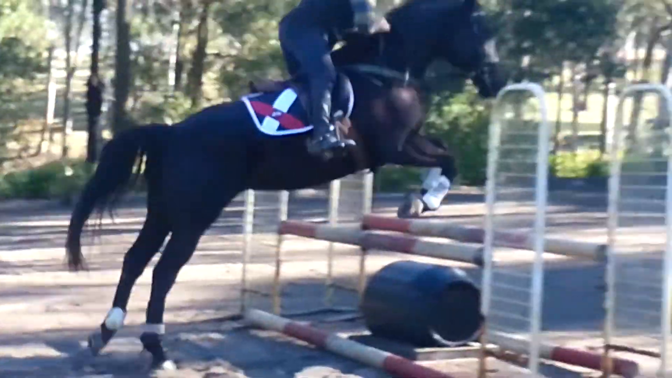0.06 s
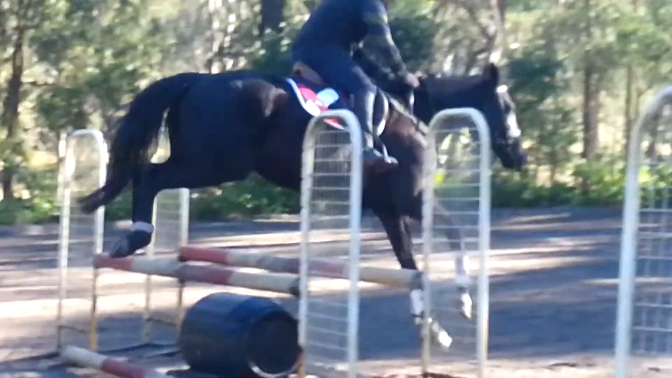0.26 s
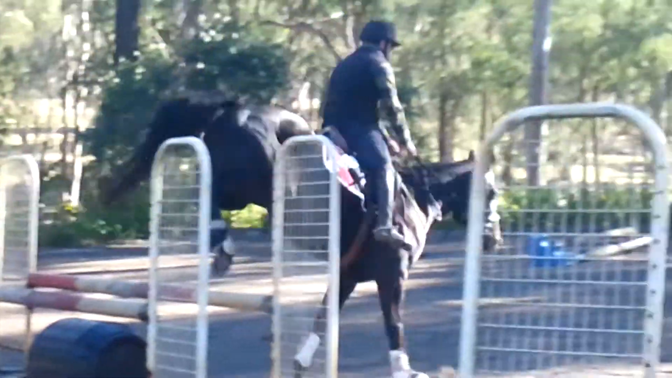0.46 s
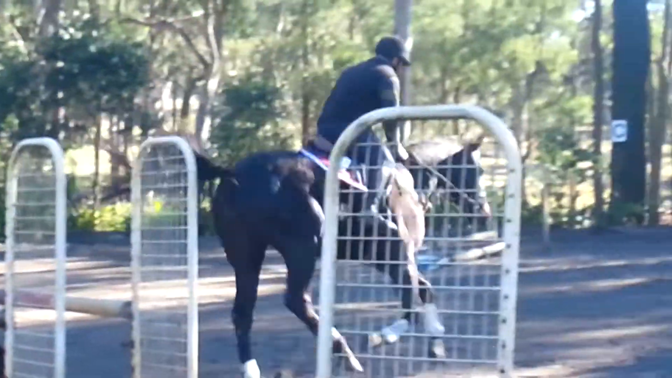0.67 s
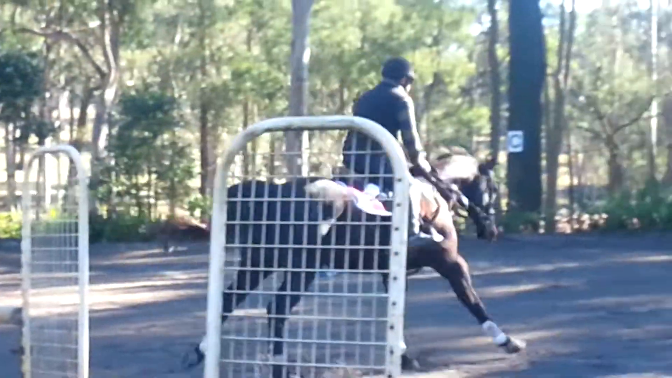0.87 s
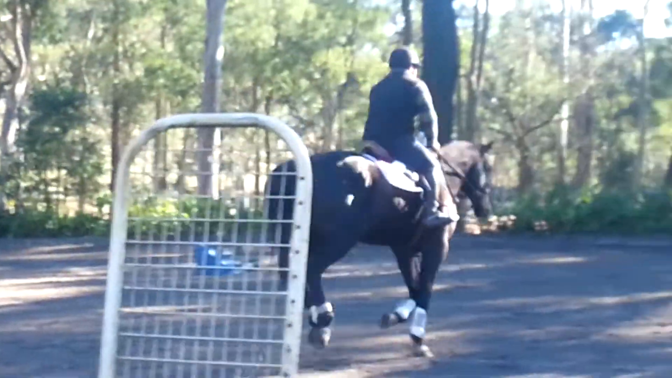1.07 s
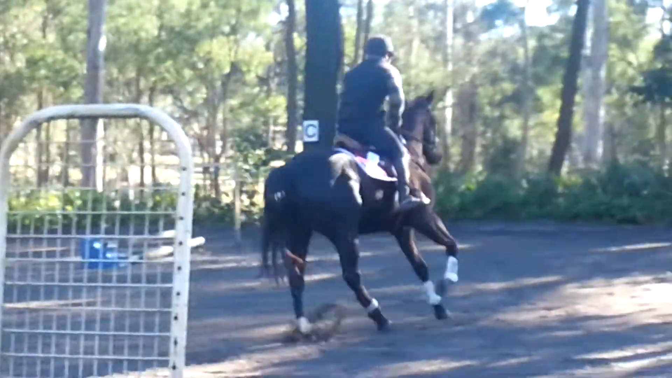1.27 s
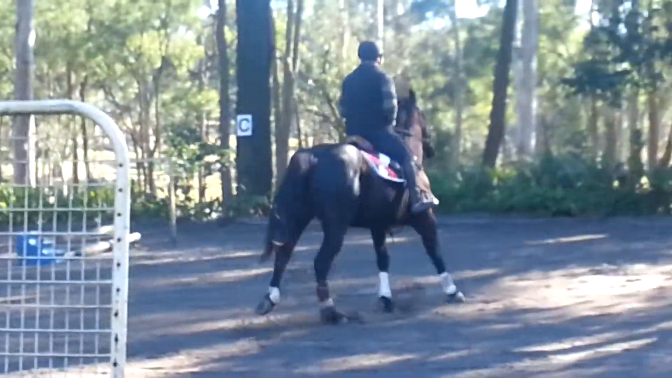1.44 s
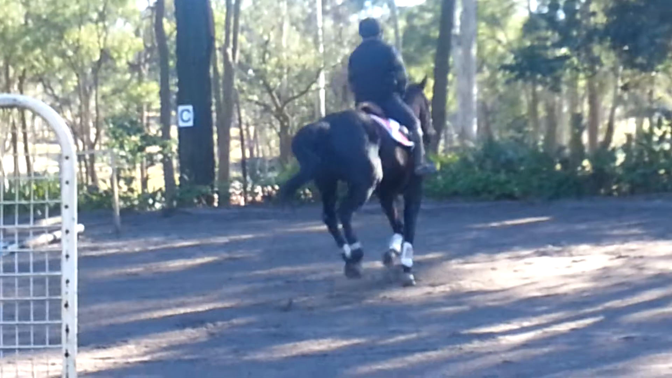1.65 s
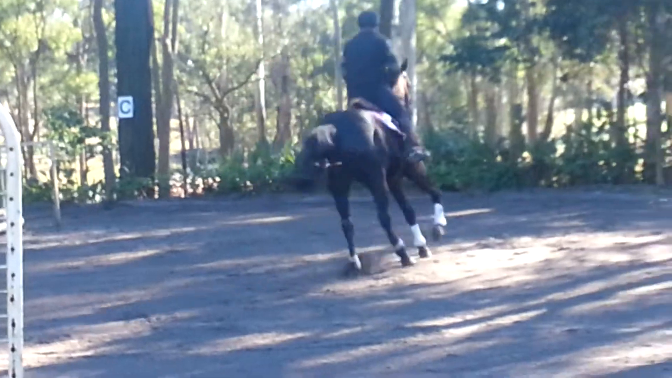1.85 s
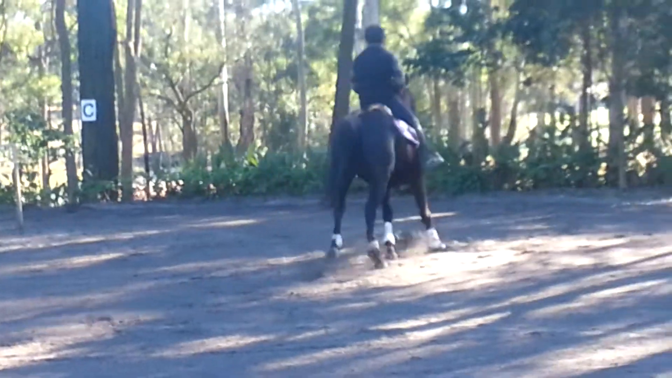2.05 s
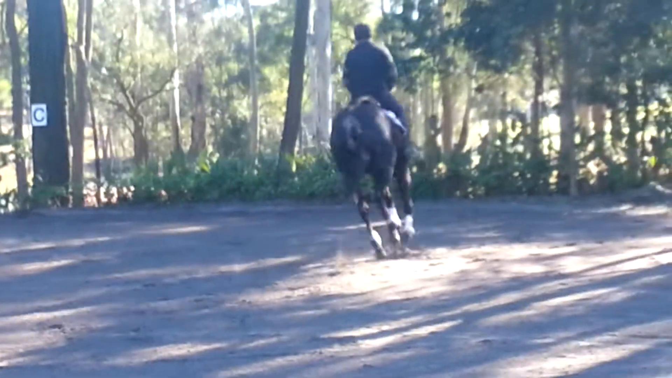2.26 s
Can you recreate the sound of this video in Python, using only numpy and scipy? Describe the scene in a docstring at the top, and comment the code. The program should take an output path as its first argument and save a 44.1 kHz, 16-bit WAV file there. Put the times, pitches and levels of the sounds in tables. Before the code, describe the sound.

A horse's hoof knocks a jump pole loudly, then it canters away on loose dirt outdoors

```python
"""Birds whistle over the hush of the woods; then a horse comes down from a jump with one loud knock,
probably a hoof on the pole. The pole and its metal stand ring as damped modes, and the trees around
the arena scatter the sound as decaying noise. The horse canters away on loose dirt: thuds are damped
sines, crunches and sprays of sand are shaped noise, and clicks of tack and grit are brief bursts.
The birds are gliding sines, and the hush is coloured noise."""
import sys
import numpy as np
from scipy import signal
from scipy.fft import rfft, irfft
from scipy.io import wavfile

SR = 44100
rng = np.random.default_rng(int(sys.argv[2]) if len(sys.argv) > 2 else 0)


def transcribe(u):
    """Save the signal u as a 16-bit wav file named by the first command-line argument.

    u: samples, shape (n,) or (channels, n), limited to [-1, 1]; the rate is SR.
    q: integer samples, one column per channel.
    """
    v = np.clip(np.atleast_2d(u).T, -1, 1)
    q = np.round(v * 32767).astype(np.int16)
    wavfile.write(sys.argv[1], SR, q)


N = 101430
T, HZ = np.arange(N) / SR, np.fft.rfftfreq(N, 1 / SR)  # time [s] and frequency [Hz] axes

# Likeness of the two ports: (frequency [Hz], left-right correlation [-1 to 1])
PORT_LIKENESS = [(50, 0.94), (170, 0.95), (330, 0.75), (650, 0.67), (1000, 0.58), (2000, 0.24),
                 (4000, 0.55), (8000, 0.23), (13000, 0.16)]
# Usual balance of the noises: (frequency [Hz], left-right difference [dB])
PORT_BALANCE = [(200, 0), (700, 0), (1300, -1), (2400, 2), (4400, 3.9), (8000, 2), (14000, -4.5)]
PORT_LEAD_S, CRACK_LEAD_S = 3e-5, 5.5e-5  # sound reaches the left port first

# Spectrum of the outdoor hush: (frequency [Hz], relative level [dB])
HUSH_COLOUR = [(20, -30), (40, -40), (65, -6.5), (110, -3), (200, 1), (320, 3.5), (500, -2.5), (800, -2.5),
               (1300, -11), (2200, -11.5), (3300, -13.5), (4300, -14), (5500, -20), (9000, -22),
               (14000, -20.5), (16000, -67)]
HUSH_DB, HUSH_FADE_DB_PER_S, HUSH_GRAIN_DB, HUSH_DRIFT_DB = -45, -1.1, 1, -0.94

# Bird whistles: (start [s], length [s], start pitch [Hz], middle pitch [Hz], end pitch [Hz],
# level at the middle pitch [dB], left-right difference [dB])
WHISTLES = [(-.02, 0.038, 3230, 3090, 3200, -46, 0), (0.538, 0.032, 4500, 4530, 4340, -48, 17),
            (0.565, 0.062, 3920, 3100, 2700, -49.5, 5), (.176, 0.029, 2850, 3074, 3270, -46, 2),
            (0.37, 0.025, 4000, 3670, 3400, -51, -3), (0.864, .075, 3500, 3990, 4200, -48, 3),
            (1.035, 0.049, 4500, 4580, 4600, -56, 6), (1.094, 0.042, 3080, 2920, 2650, -47.5, 2),
            (1.099, 0.078, 4000, 3600, 3230, -55.5, -8), (1.662, 0.1, 3200, 3710, 4170, -42.5, -7),
            (1.805, 0.12, 4233, 4180, 4137, -41.5, -6), (2.096, 0.095, 3200, 3510, 4070, -54, -3),
            (2.232, .07, 3300, 3310, 3350, -59, -9), (2.264, 0.053, 3820, 3900, 4050, -59, -19)]
WHISTLE_EDGE_S, WHISTLE_FLUTTER_DB, WHISTLE_WAVER = .014, 1.6, .006  # waver: rms fraction of the pitch
WHISTLE_DB_PER_KHZ = 9.5  # a whistle swells as it climbs
BIRD_ECHO_DB, BIRD_T60_S = -5.5, 1.0

# Dirt scuffed and thrown: (peak time [s], rise [s], fall [s], crunch level before its peak is added [dB],
# crunch centre [Hz], spray level [dB], spray left-right difference [dB])
SCUFFS = [(.05, 0.032, 0.098, -53.5, 2020, -63, -3), (0.148, 0.0048, 0.012, -41.5, 1500, -44, -2),
          (.137, 0.011, 0.0055, -45, 1480, -50.5, 3), (.166, 0.0063, 0.0062, -45, 2010, -46, -8),
          (0.188, 0.0059, .012, -40.5, 1680, -66, 0), (.435, .02, 0.028, -44.5, 2500, -45, -10),
          (0.521, 0.011, 0.011, -40.5, 1630, -42, 3), (.59, 0.027, 0.09, -48, 1540, -54, 0),
          (0.758, 0.0078, 0.0069, -41, 2200, -40, 0.5), (0.861, .022, 0.05, -45.5, 2310, -43.5, 1.5),
          (.96, 0.013, 0.018, -49, 905, -55, 0), (1.037, 0.019, 0.044, -48, 2360, -45, 1.5),
          (1.084, 0.0054, 0.021, -56, 2820, -51.5, -20), (1.21, 0.01, 0.01, -49, 1020, -49.5, 6),
          (1.258, 0.023, 0.019, -45, 1350, -54, 0), (1.303, 0.016, 0.034, -45, 1700, -43.5, 0.5),
          (1.427, 0.0094, 0.023, -51.5, 2200, -45, 2), (1.495, 0.012, 0.013, -51, 810, -49, 2),
          (1.57, 0.013, 0.067, -53, 2260, -48.5, 0), (1.626, 0.016, 0.013, -54, 1520, -49, -3),
          (1.672, 0.0094, 0.041, -57, 2500, -48.5, 2), (1.97, 0.0087, 0.019, -57, 3000, -49, 3),
          (2.074, 0.0077, 0.0074, -49.5, 900, -52.5, 6), (2.18, 0.033, 0.014, -52, 715, -52.5, -2)]
# Spectrum of the crunch, also the grit of the thuds: (frequency [Hz], relative level [dB])
CRUNCH_COLOUR = [(50, -29), (150, 3.5), (300, 4), (750, 7), (1150, -1), (1700, 1.5), (3000, -1.5),
                 (4500, -3.5), (7000, -28), (15000, -16)]
# Spectrum of the sand spray: (frequency [Hz], relative level [dB])
SPRAY_COLOUR = [(300, 12), (2000, -1.5), (4200, 7), (7000, -2.5), (10000, -4), (15000, -13.5)]
CRUNCH_GRAIN_DB, SPRAY_GRAIN_DB = 3, 2.5
CRUNCH_Q, CRUNCH_PEAK_DB = 2.4, 3

# Hoof thuds: (time [s], level [dB], pitch [Hz], swell time [s])
THUDS = [(.1455, -30.5, 1585, 0.0014), (.1485, -31, 720, 0.0017), (.441, -32, 280, 0.0027),
         (.447, -40, 136, 0.0047), (.508, -37, 648, 0.0044), (.7142, -34.5, 925, .001),
         (.752, -41, 280, 0.0043), (0.8393, -33, 337, 0.0015), (.866, -36, 261.4, 0.0079),
         (.9565, -25.5, 790, 0.00073), (1.0142, -33.5, 576, 0.00058), (1.02, -40, 253, 0.0088),
         (1.029, -37, 400, 0.00068), (1.214, -38, 590, 0.0012), (1.297, -42, 600, 0.0065),
         (1.324, -37.5, 770, 0.0011), (1.409, -40.5, 718, 0.0048), (1.5408, -28.5, 244, 0.0023),
         (2.178, -43.5, 693, .005)]
THUD_GRIT = 0.28  # noise gain beside the unit sine

# Clicks of tack and flung grit: (time [s], level [dB], left-right difference [dB])
CLICKS = [(0.2016, -35, 4), (0.84, -33, 4), (0.9576, -46, 5), (1.015, -46, 0), (1.291, -34, 7),
          (1.302, -33, 9), (1.522, -27.5, 3), (1.528, -28.5, -5), (1.617, -38, 4)]
# Spectrum of the clicks: (frequency [Hz], relative level [dB])
CLICK_COLOUR = [(500, -2), (3000, -16), (4200, -0.5), (6500, -9.5), (9000, -21), (15000, -15)]
CLICK_RISE_S, CLICK_FALL_S = .0001, 0.00087
CANTER_ECHO_DB, CANTER_T60_S = -10.5, 0.88

# The hoof clatters on the pole: (time [s], push on the pole [dB], crack level [dB], crack dulled above [Hz])
BLOWS = [(0.228, -12.5, -29, 1200), (0.2308, 1, -12, 9000), (.2342, -5.5, -8.5, 12900),
         (0.2403, -1.5, -12, 6000), (0.2449, -3.5, -11, 6050), (0.2557, -29, -8, 2800),
         (0.2612, -11, -8.5, 1670)]
# Modes of the pole: (frequency [Hz], level before the push [dB], t60 [s])
POLE_MODES = [(197, -26, 0.086), (270, -14.5, 0.042), (369, -13.5, 0.037), (496, -24.5, 0.079),
              (786, -31, 0.24), (940, -37, 0.11), (1080, -31.5, 0.1), (1457, -17.5, 0.046),
              (1540, -38, 0.19), (1717, -26.5, 0.11), (1797, -37, 0.27)]
POLE_LOW_HZ = 178  # the thin pole radiates little below this
# Spectrum of the crack: (frequency [Hz], relative level [dB])
CRACK_COLOUR = [(40, -42), (110, -16), (200, -24), (300, -14), (600, -0.5), (1100, -4.5), (1600, -1),
                (2400, 3), (3200, -10.5), (4300, 5), (5500, -3), (7000, -19.5), (10500, -7.5), (15000, -38)]
# Balance of the crack: (frequency [Hz], left-right difference [dB])
CRACK_BALANCE = [(200, 2), (1300, -5), (2400, 2), (4400, 1), (8000, 21), (15000, -25)]
CRACK_RISE_S, CRACK_FALL_S = 0.00036, 0.003
# Modes of the metal stand: (frequency [Hz], level before the build-up [dB], t60 [s], left-right difference [dB])
STAND_MODES = [(2614, -34, 0.66, 17), (3950, -34, .35, -9), (4200, -11.5, 0.43, -1), (4200, -31, 0.26, -4),
               (4245, -18, 0.52, -3), (4550, -36, 0.27, 9)]
STAND_S, STAND_RISE_S = .2342, 0.12  # the ring builds up, then dies
# Spectrum of the knock's echo: (frequency [Hz], relative level [dB])
ECHO_COLOUR = [(40, -38), (130, -19), (220, 1), (330, 2), (520, -11.5), (800, 2), (1200, -9.5), (1600, 2),
               (2050, -8), (2550, 1), (3250, -14), (3750, -4.5), (4300, 2), (5200, -9.5), (7000, -17.5),
               (12000, -22.5), (15000, -36)]
# Decay of that echo among the trees: (frequency [Hz], t60 [s])
WOODS_T60 = [(100, 0.43), (300, 0.54), (800, 0.72), (2000, 0.58), (4300, .7), (7000, 0.41), (14000, 0.67)]
ECHO_S, ECHO_DB, ECHO_RISE_S = .236, -19.5, 0.0037
ECHO_GRAIN_DB, ECHO_CLUMP_DB = 1, 1.33

LOW_CUT_HZ, EDGE_HZ = 58, 15000  # band kept by the recorder


def amp(db):
    """Logarithmic level: an amplitude gain is ten to the power dB / 20."""
    return 10 ** (np.asarray(db) / 20)


def unit(x):
    """Normalisation: mean power sets the scale, so the rms becomes 1."""
    return x / np.sqrt(np.mean(x ** 2) + 1e-20)


def read(points, hz):
    """Logarithmic frequency: interpolates a table linearly along log(hz + 1)."""
    f, value = np.transpose(points)
    return np.interp(np.log(hz + 1), np.log(f + 1), value)


def pan(db):
    """Level difference between ports: half raises the left, half lowers the right."""
    db = np.atleast_1d(db)
    return amp(np.array([db, -db]) / 2)


def wander(hz):
    """Random modulation: white noise under a Gaussian low-pass, at rms 1."""
    spectrum = rfft(rng.standard_normal(N)) * np.exp(-(HZ / hz) ** 2)
    return unit(irfft(spectrum, N))


def noise(colour, grain_db=0, side=PORT_BALANCE, lead_s=PORT_LEAD_S):
    """Partial coherence: shared and opposed noises form two coloured, unevenly grainy ports."""
    grains = amp(grain_db * wander(640))
    a, b = rfft(rng.standard_normal((2, N)) * grains)
    same = np.clip(read(PORT_LIKENESS, HZ), -1, 1)
    shared, apart = np.sqrt(1 + same) * a, np.sqrt(1 - same) * b
    delay = np.exp(-2j * np.pi * HZ * lead_s)
    ports = np.array([shared + apart, (shared - apart) * delay])
    return unit(irfft(ports * amp(read(colour, HZ)) * pan(read(side, HZ)), N))


def since(s):
    """Causality: time runs from a given moment and is zero before it."""
    return np.maximum(T - s, 0)


def build_up(s, rise_s):
    """Exponential approach: amplitude grows from 0 towards 1 after a given moment."""
    return 1 - np.exp(-since(s) / rise_s)


def burst(s, rise_s, fall_s):
    """Impulsive envelope: exponential build-up multiplied by exponential decay."""
    return build_up(s, rise_s) * np.exp(-since(s) / fall_s)


def trees(x, t60):
    """Diffuse reverberation: convolution with decaying noise, nearly mono in the bass."""
    tail = noise([(1, 0), (SR, 0)]) * burst(0, 0.0067, t60 / np.log(1000))
    tail = tail / np.linalg.norm(tail[0])  # unit energy on the left
    return signal.fftconvolve(x, tail, axes=1)[:, :N]


def hush():
    """Stationary coloured noise: slow fading and random level drift make it softly restless."""
    level_db = HUSH_DB + HUSH_FADE_DB_PER_S * T + HUSH_DRIFT_DB * wander(36)
    return noise(HUSH_COLOUR, grain_db=HUSH_GRAIN_DB) * amp(level_db)


def birds():
    """Frequency modulation: integrating a gliding pitch gives nearly pure, reverberant whistles."""
    waver = 1 + WHISTLE_WAVER * wander(109)
    flutter = amp(WHISTLE_FLUTTER_DB * wander(100))
    out = np.zeros((2, N))
    for s, length, first, middle, last, db, lr in WHISTLES:
        u = np.clip((T - s) / length, 0, 1)
        bend = (2 * middle - first - last) * 2 * u * (1 - u)  # parabola through the middle pitch
        hz = first + (last - first) * u + bend
        gate = np.clip(np.minimum(u, 1 - u) * length / WHISTLE_EDGE_S, 0, 1)
        swell = amp(db + WHISTLE_DB_PER_KHZ * (hz - middle) / 1000)
        tone = np.sin(2 * np.pi * np.cumsum(hz * waver) / SR)
        out += swell * pan(lr) * gate * flutter * tone
    return out + amp(BIRD_ECHO_DB) * trees(out, BIRD_T60_S)


def scuffs():
    """Granular friction: each stroke shapes a resonant crunch of dirt and a spray of sand."""
    crunch = noise(CRUNCH_COLOUR, grain_db=CRUNCH_GRAIN_DB)
    spray = noise(SPRAY_COLOUR, grain_db=SPRAY_GRAIN_DB)
    out = np.zeros((2, N))
    for s, rise, fall, crunch_db, hz, spray_db, lr in SCUFFS:
        stroke = np.exp(-.5 * (np.minimum(T - s, 0) / rise) ** 2 - since(s) / fall)
        peak = signal.lfilter(*signal.iirpeak(hz, CRUNCH_Q, SR), crunch)
        body = crunch + amp(CRUNCH_PEAK_DB) * peak
        out += stroke * (amp(crunch_db) * body + amp(spray_db) * pan(lr) * spray)
    return out


def thuds():
    """Heavy damping: each hoof gives the ground a short, slightly gritty oscillating bump."""
    grit, out = noise(CRUNCH_COLOUR), np.zeros((2, N))
    for s, db, hz, swell in THUDS:
        u = since(s) / swell
        bump = u * np.exp(1 - u)  # peaks at 1 after the swell time
        out += amp(db) * bump * (np.sin(2 * np.pi * hz * since(s)) + THUD_GRIT * grit)
    return out


def clicks():
    """Impulsive contact: very brief noise bursts give tiny bright ticks."""
    strokes = sum(amp(db) * pan(lr) * burst(s, CLICK_RISE_S, CLICK_FALL_S) for s, db, lr in CLICKS)
    return noise(CLICK_COLOUR) * strokes


def ring(s, hz, db, t60):
    """Free vibration: one mode is a sine losing 60 dB in its t60, cut off after two."""
    out, live = np.zeros(N), slice(*np.searchsorted(T, [s, s + 2 * t60]))
    t = T[live] - s
    out[live] = amp(db - 60 * t / t60) * np.sin(2 * np.pi * hz * t)
    return out


def dulled(x, hz):
    """Treble loss: a gentle second-order low-pass, held 1 kHz short of half the sample rate."""
    return signal.lfilter(*signal.butter(2, min(hz, SR / 2 - 1000), fs=SR), x)


def die_away(x, s):
    """Frequency-dependent decay: each band fades from a moment on, as it does among the trees."""
    hz, t, z = signal.stft(x, SR, nperseg=512)
    fade = amp(-60 * np.maximum(t - s, 0) / read(WOODS_T60, hz)[:, None])
    return signal.istft(z * fade, SR, nperseg=512)[1][:, :N]


def pole():
    """Modal superposition: every blow excites all modes, and low frequencies radiate weakly."""
    modes = sum(ring(s, hz, db + push, t60) for s, push, _, _ in BLOWS for hz, db, t60 in POLE_MODES)
    return signal.sosfilt(signal.butter(5, POLE_LOW_HZ, "high", fs=SR, output="sos"), modes)


def cracks():
    """Impact noise: each blow is a sharp burst whose treble is limited, the last ones duller."""
    crack = noise(CRACK_COLOUR, side=CRACK_BALANCE, lead_s=CRACK_LEAD_S)
    out = np.zeros((2, N))
    for s, _, db, hz in BLOWS:
        out += amp(db) * burst(s, CRACK_RISE_S, CRACK_FALL_S) * dulled(crack, hz)
    return out


def stand():
    """Modal ringing: decaying metal modes share a gradual build-up."""
    modes = sum(pan(lr) * ring(STAND_S, hz, db, t60) for hz, db, t60, lr in STAND_MODES)
    return modes * build_up(STAND_S, STAND_RISE_S)


def knock_echo():
    """Diffuse scattering: the woods answer with clumped noise that decays band by band."""
    echo = die_away(noise(ECHO_COLOUR, grain_db=ECHO_GRAIN_DB), ECHO_S)
    return amp(ECHO_DB + ECHO_CLUMP_DB * wander(56)) * echo * build_up(ECHO_S, ECHO_RISE_S)


def knock():
    """Linear superposition: pole, cracks, stand and scattered echo add."""
    return pole() + cracks() + stand() + knock_echo()


def scene():
    """Linear superposition: hush, birds, canter with its reverberation, and knock add."""
    canter = scuffs() + thuds() + clicks()
    canter_echo = amp(CANTER_ECHO_DB) * trees(canter, CANTER_T60_S)
    return hush() + birds() + canter + canter_echo + knock()


def record(dry):
    """Band limiting and saturation: rumble is cut, peaks near full scale round off, then treble is cut."""
    lean = signal.lfilter(*signal.butter(2, LOW_CUT_HZ, "high", fs=SR), dry)
    rounded = lean / (1 + lean ** 8) ** (1 / 8)
    low_pass = signal.firwin(255, EDGE_HZ, window=("kaiser", 9), fs=SR)
    return signal.oaconvolve(rounded, low_pass[None], "same")


dry = scene()
out = record(dry)
transcribe(out)
```